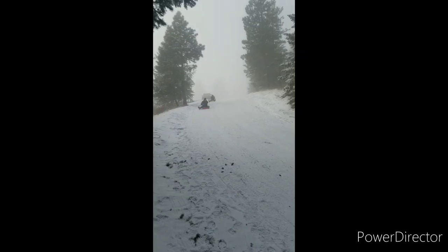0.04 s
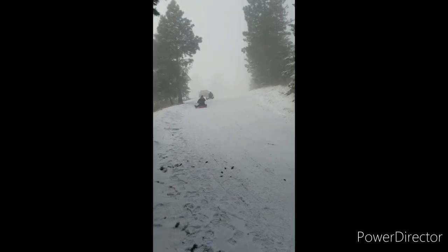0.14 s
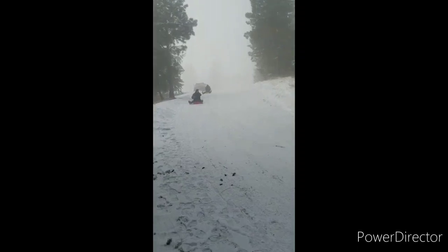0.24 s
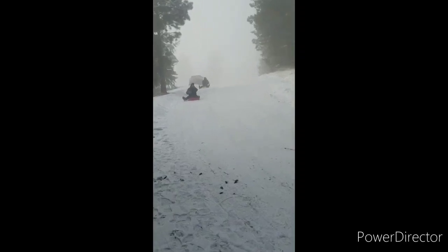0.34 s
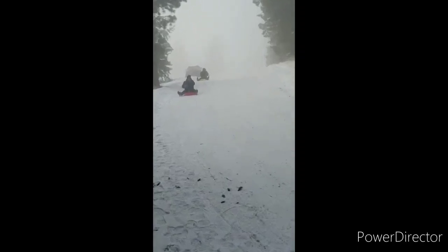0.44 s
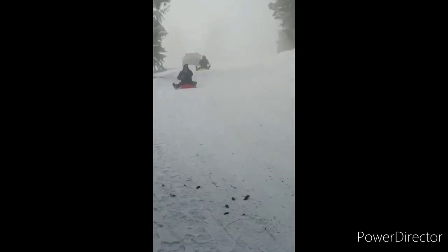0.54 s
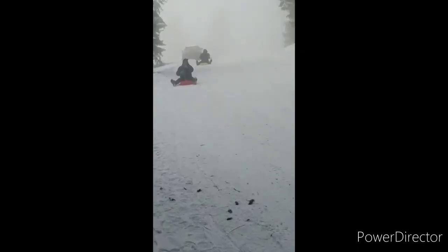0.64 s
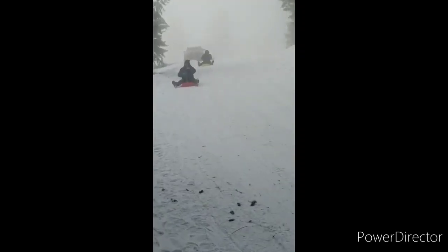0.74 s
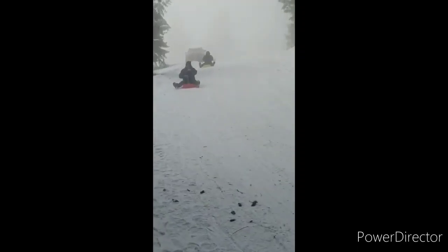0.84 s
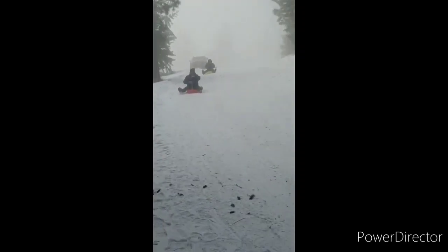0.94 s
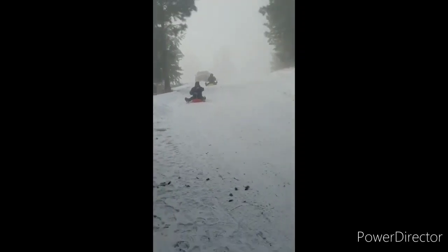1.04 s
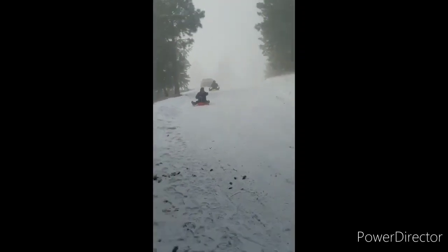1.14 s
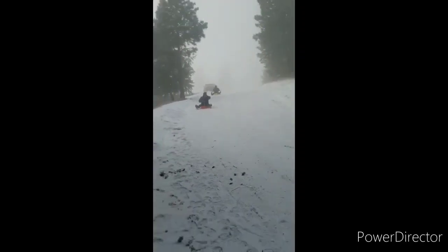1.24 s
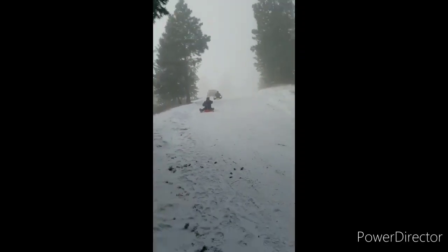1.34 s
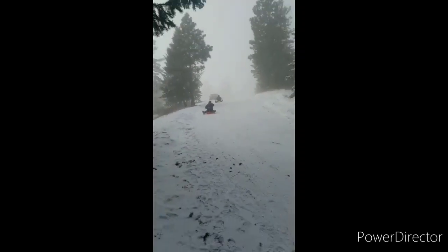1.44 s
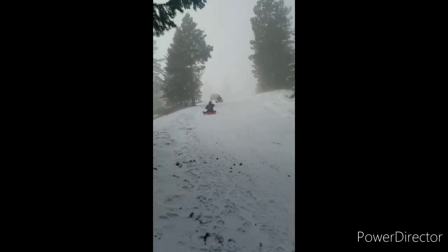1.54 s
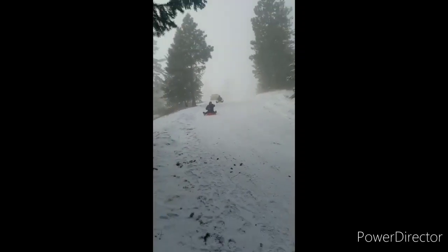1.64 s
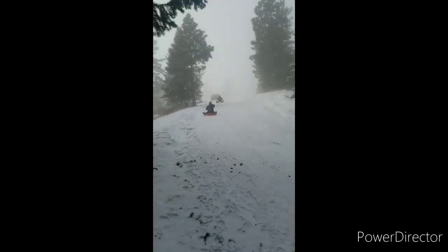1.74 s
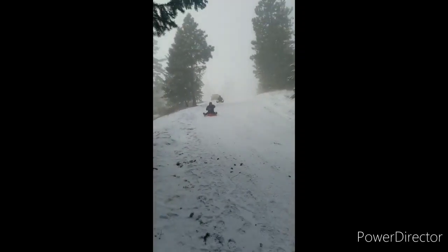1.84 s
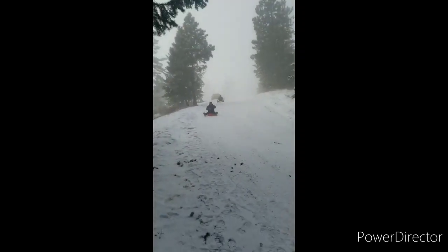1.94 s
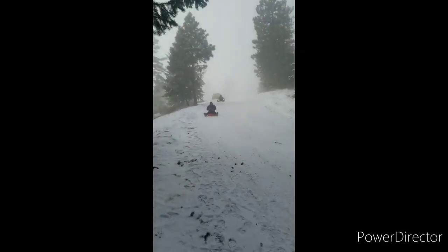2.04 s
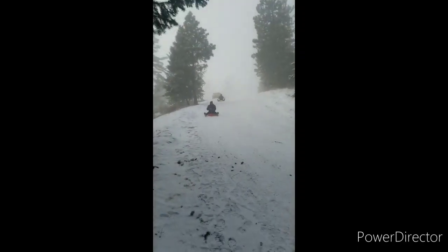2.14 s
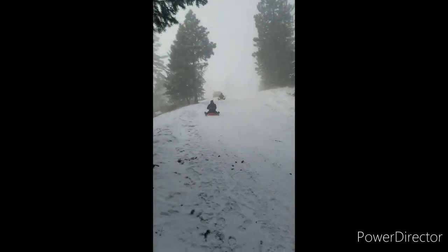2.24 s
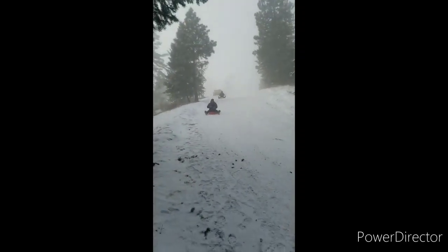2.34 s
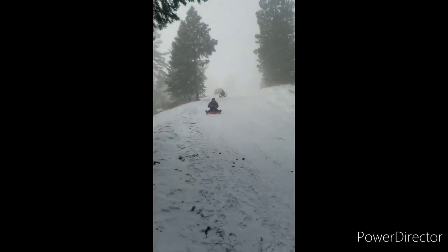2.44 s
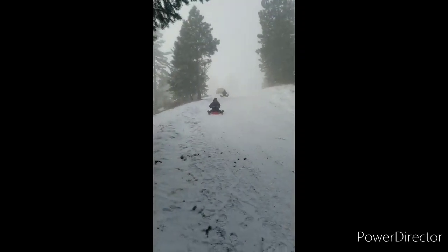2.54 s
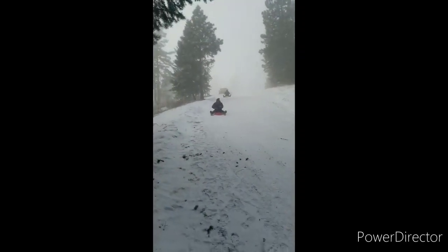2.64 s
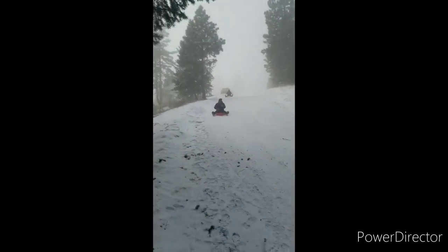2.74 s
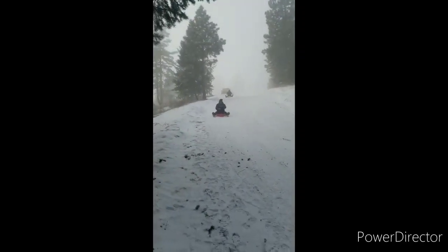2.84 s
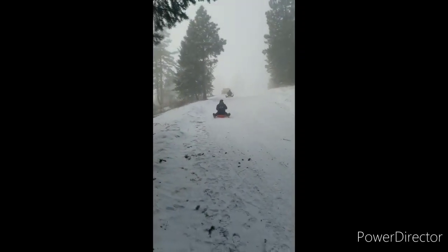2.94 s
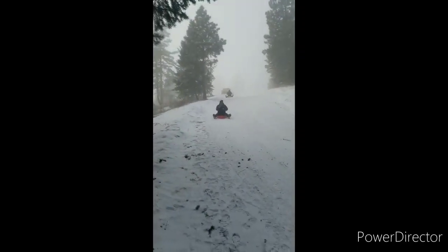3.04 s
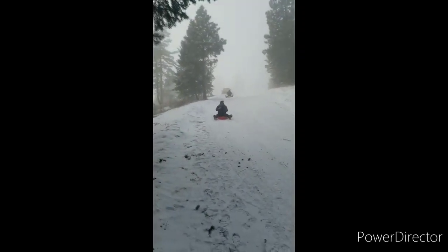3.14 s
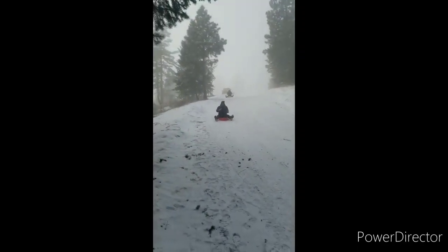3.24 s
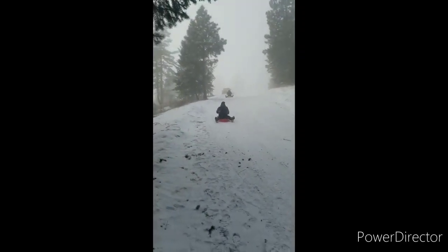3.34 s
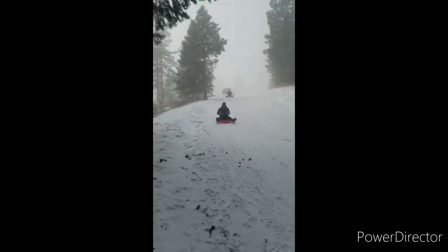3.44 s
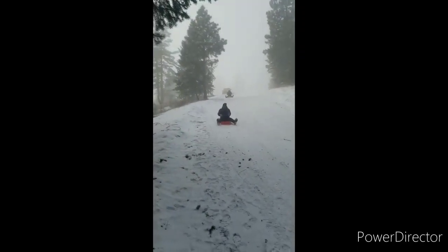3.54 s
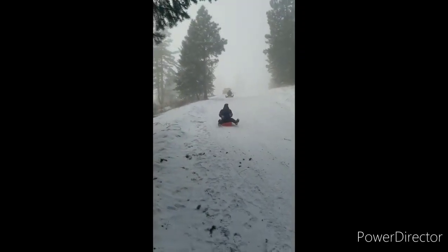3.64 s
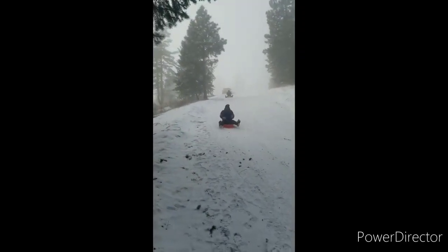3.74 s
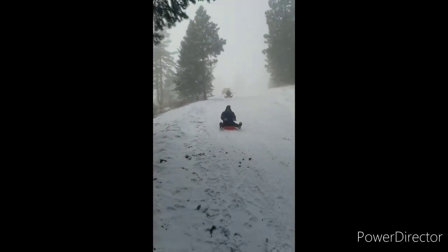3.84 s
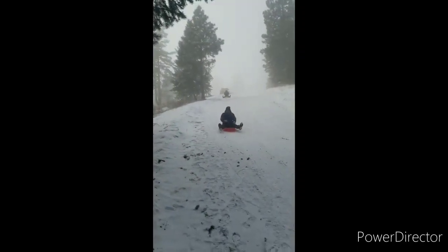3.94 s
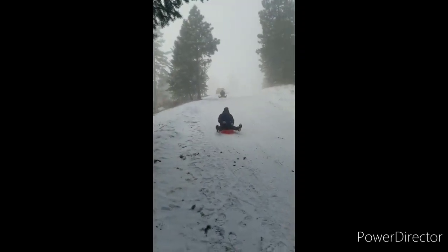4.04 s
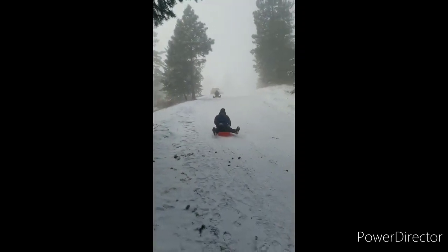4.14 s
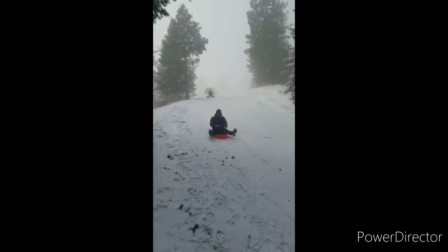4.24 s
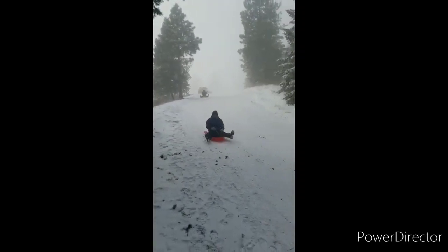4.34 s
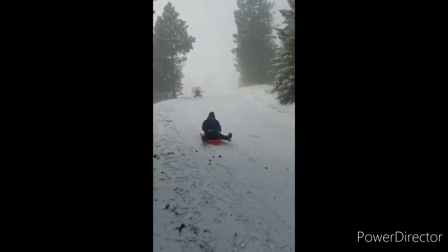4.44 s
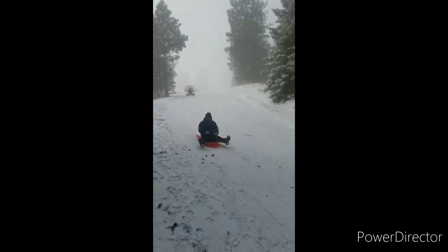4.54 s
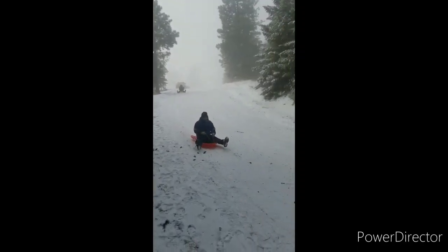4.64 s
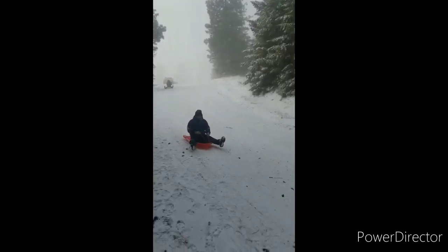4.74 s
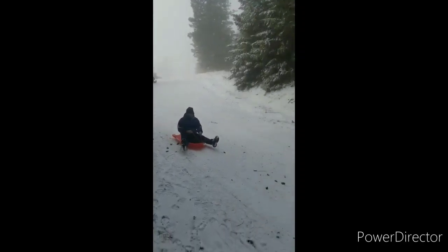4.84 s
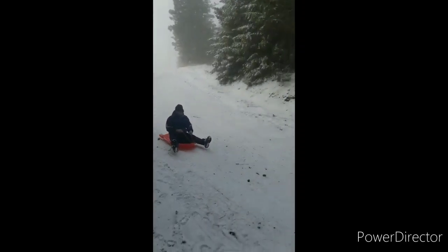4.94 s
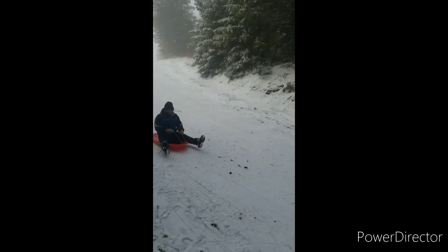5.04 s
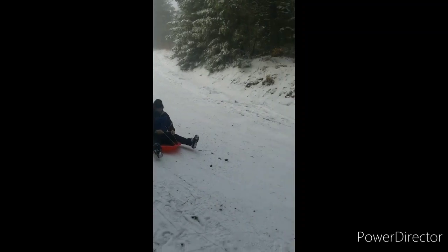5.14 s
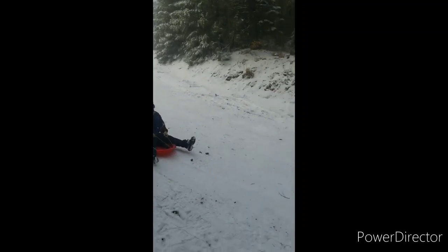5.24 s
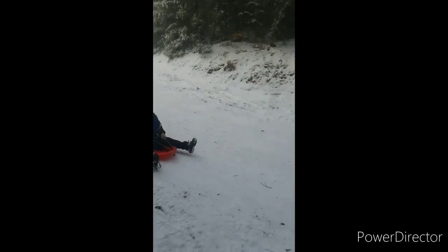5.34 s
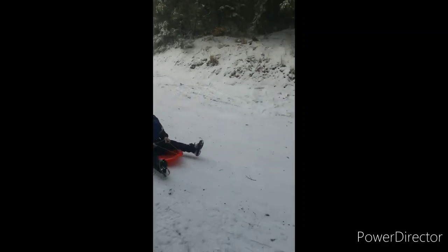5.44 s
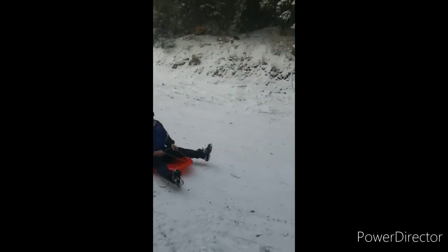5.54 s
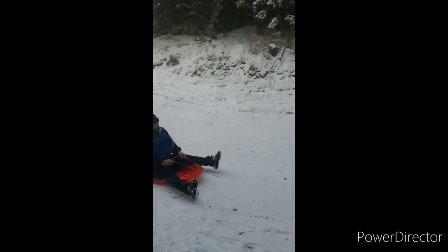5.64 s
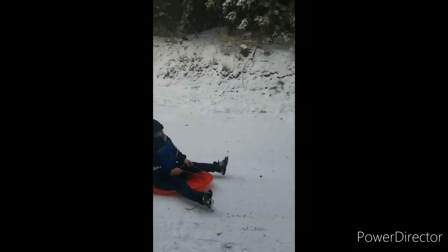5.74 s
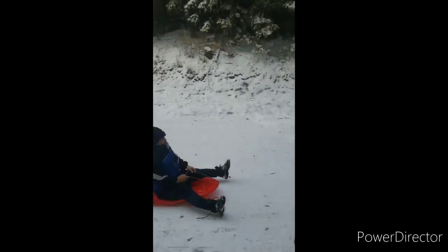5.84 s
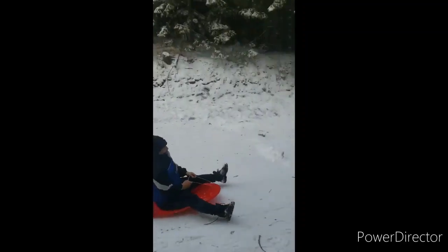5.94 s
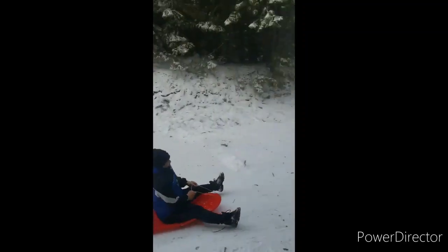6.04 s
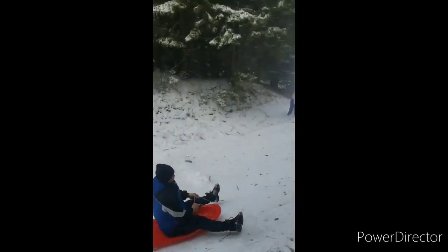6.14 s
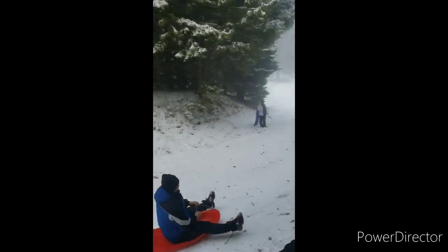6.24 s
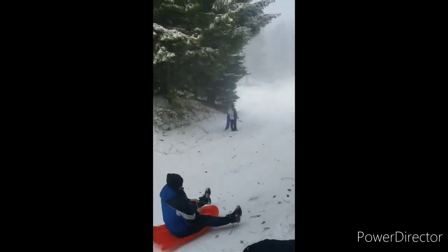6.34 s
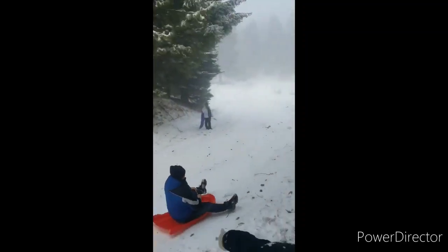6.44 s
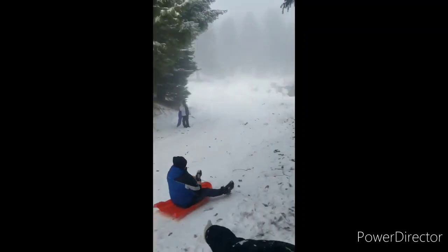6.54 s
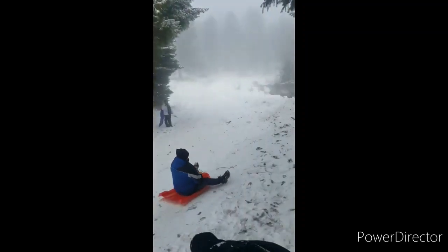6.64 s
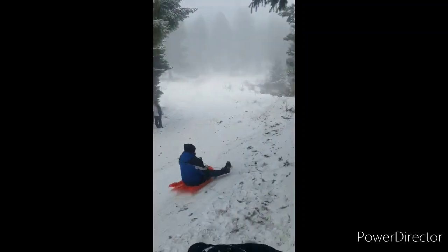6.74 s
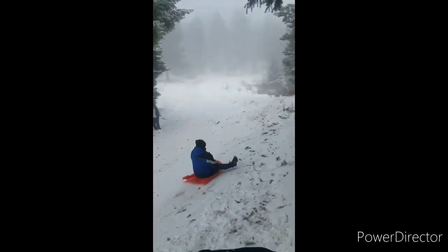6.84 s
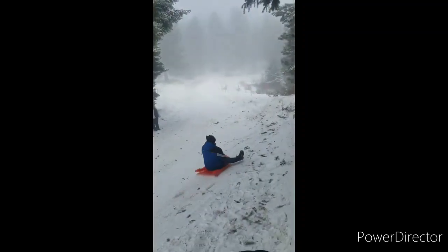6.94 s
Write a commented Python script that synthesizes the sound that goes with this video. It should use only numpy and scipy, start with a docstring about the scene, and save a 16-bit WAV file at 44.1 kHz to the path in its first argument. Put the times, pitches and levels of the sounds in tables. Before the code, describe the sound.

A plastic sled hisses and scrapes down a snowy slope, growing into a drumming, clacking rush past the camera, with handling ticks and crunching boots.

```python
"""Plastic sled passing on snow

A plastic sled comes down a snowy track from afar and passes close by a hand-held camera with two ports.
Snow grains hiss under it, crust drums and scrapes on its hull, lumps flex it and clods clack on its rim.
Close to the camera, boots crunch, squeak and crack the crust, a sleeve rustles, and fingers, a shifting
hand and knocks sound on the case, over low buffeting air. Grains are random clicks, knocks short swings."""
import sys
import numpy as np
from scipy import signal
from scipy.fft import rfft, irfft
from scipy.io import wavfile
from scipy.ndimage import map_coordinates

SR = 44100
rng = np.random.default_rng(int(sys.argv[2]) if len(sys.argv) > 2 else 0)


def persist_wave(psi):
    """Save psi, clipped to +-1, as 16-bit WAV."""
    counts = np.round(np.clip(psi, -1, 1) * 32767).astype(np.int16)
    wavfile.write(sys.argv[1], SR, np.atleast_2d(counts).T)


N = 308352
TIME = np.arange(N) / SR
FREQS = np.fft.rfftfreq(N, 1 / SR)
EDGE_HZ = 14700  # upper band limit of the recorder

# Levels in all tables are relative: layers add their own trims. Colours give relative density per Hz.
# sliding friction, swelling as the sled nears: time_s, level_db
GLIDE_LEVEL = [(0, -57.5), (.25, -62), (1.15, -61.5), (2.15, -59), (3.4, -57.5), (3.97, -55), (4.8, -52),
               (5.4, -46), (5.8, -45), (6.2, -42), (6.55, -45.5), (6.99, -42)]
# bearing of the sled: time_s, left_port_lag_ms, holder_echo_delay_ms (at the right port)
SLED_BEARING = [(0, -0.14, 0.38), (1.5, -0.036, 0.57), (2.2, -0.18, 0.64), (2.9, -0.06, 0.61),
                (4, -0.045, 0.68), (5, 0.038, 0.46), (5.4, 0.05, 0.38), (6, 0.118, 0.23),
                (6.35, 0.32, 0.21), (6.6, 0.43, 0.26), (7, 0.27, 0.33)]
# roughness of the crust under the hull: time_s, drumming_above_friction_db
CRUST_ROUGHNESS = [(2.9, 7), (3.3, 2), (3.6, 3), (4.15, 7.5), (5.1, 9), (5.55, 10.5), (6.2, 7), (6.8, 7)]
# hiss while up the slope: pitch_hz, density_db
HISS_FAR_COLOUR = [(600, -14), (1100, 0), (1350, -13), (1700, 0), (2200, -3), (3100, -4), (4000, -0.5),
                   (5000, 1.5), (6500, 1.5), (8800, -5.5), (10500, -3.5), (12600, 2), (14500, 0.5)]
# hiss in front: pitch_hz, density_db
HISS_NEAR_COLOUR = [(650, -1), (1100, -16), (1160, -4.5), (1400, -2), (1720, -3), (2120, 1), (2700, -4.5),
                    (2970, -3), (3390, -5), (4510, -3.5), (7290, -3.5), (8970, -9), (12200, 0),
                    (14000, -2.5), (15000, -21)]
# hiss alongside: pitch_hz, density_db
HISS_PAST_COLOUR = [(650, -13), (1100, 9), (1230, 0.5), (1400, 12), (1800, 5.5), (2100, 6), (2500, -0.5),
                    (3040, -5.5), (3350, -4.5), (3820, 0.5), (7060, -2), (9370, -8.5), (12500, -4.5),
                    (14200, -1), (15000, -32)]
# left-right balance of the hiss up the slope: pitch_hz, left_over_right_db
BALANCE_FAR = [(800, -4), (1600, -8), (2600, 2), (5000, -4), (6800, -6.5), (8800, -0.5), (10500, -1),
               (12500, -9), (14000, 1)]
# the same in front: pitch_hz, left_over_right_db
BALANCE_AHEAD = [(500, -12), (900, 28), (1500, -5.5), (2500, 3), (3400, -1.5), (5200, -3.5), (7300, -2),
                 (8300, 0), (10700, -0.5), (12100, -4.5), (13800, -1)]
# the same alongside: pitch_hz, left_over_right_db
BALANCE_ASIDE = [(1000, -4.5), (2500, 0.5), (4500, -2), (7100, -15.5), (8800, -1), (10000, -7),
                 (12300, -18), (14000, 3)]
# how alike the two ports hear the hiss: pitch_hz, likeness (0-1)
PORT_LIKENESS = [(500, 0.46), (1500, 0.74), (2700, 0.68), (5000, 0.58), (9500, 0), (14000, 0.1)]
# drumming plastic hull: pitch_hz, density_db
HULL_COLOUR = [(53, -60), (90, -7.5), (151, -3.5), (236, -0.5), (344, -6.5), (387, -8), (457, -12.5),
               (508, -15), (732, -14.5), (1020, -17), (1170, -32), (1500, -21.5), (1950, -49), (3300, -120)]
# gritty scrape of the hull: pitch_hz, density_db
SCRAPE_COLOUR = [(150, -2), (300, 0.5), (500, -6), (800, 4.5), (1000, -8.5), (1200, -18), (1500, -8.5),
                 (2500, -17)]
# hull on larger lumps: peak_s, flex_db, flex_hz, ring_s, grit_db, grit_length_s
HULL_BUMPS = [(3.417, -37.5, 200, 0.0027, -54, 0.066), (3.567, -34, 288, 0.0038, -53, 0.008),
              (3.696, -40, 300, 0.0069, -67, 0.0071), (3.769, -37, 198, 0.011, -45.5, 0.016),
              (3.791, -35, 237, 0.0071, -61, 0.0097), (3.976, -31, 228, 0.0077, -66, 0.0088),
              (4.0613, -21.5, 290, 0.0015, -31.5, 0.0039), (4.259, -32.5, 236, 0.0054, -62, 0.0068),
              (4.348, -31, 290, 0.0046, -56, 0.0084), (4.406, -33, 220, 0.0054, -40, 0.018),
              (4.461, -29.5, 245, 0.0055, -39, 0.0077), (4.524, -30.5, 247, 0.0058, -39.5, 0.01),
              (4.578, -28.5, 209, 0.0059, -51, 0.0069), (4.618, -34, 300, .005, -48, .007),
              (4.763, -27.5, 240, 0.0073, -46, 0.016), (4.841, -30, 252, 0.0065, -37, 0.014),
              (4.879, -22, 234, 0.004, -39, 0.006), (4.931, -32, 149, 0.0028, -58, .007),
              (4.944, -28.5, 220, 0.0043, -39, 0.01), (5.081, -31, 273, 0.004, -54, .008),
              (5.21, -29.5, 227, .006, -43, 0.0088), (5.32, -17.5, 233, 0.0042, -45, 0.0049),
              (5.479, -22.5, 248, 0.0048, -41, .012), (5.498, -30, 260, 0.0048, -43, 0.019),
              (5.523, -27.5, 248, 0.0072, -32, 0.0099), (5.5597, -21.5, 343, .007, -29, 0.017),
              (5.777, -20, 260, 0.0072, -37, .008), (5.809, -29.5, 282, 0.01, -52, .008),
              (5.934, -30, 246, 0.0079, -36, 0.019), (6.036, -25, 330, 0.0044, -34, 0.006),
              (6.058, -24.5, 290, 0.0055, -27, 0.0064), (6.082, -27, 294, 0.01, -35, 0.012),
              (6.147, -21, 260, 0.0038, -41, 0.0092), (6.1774, -25, 263, 0.011, -32.5, 0.02),
              (6.223, -30, 250, 0.009, -46, .008), (6.32, -28, 257, 0.0065, -52, 0.0081)]
# crust breaking against the hull: pitch_hz, density_db
RATTLE_COLOUR = [(200, 2.5), (450, 3.5), (900, -4.5), (1300, -18), (2500, -21), (6000, -26)]
# hard clods on the stiff rim: peak_s, level_db, pitch_hz
RIM_CLODS = [(4.061, -29, 684), (4.345, -45, 855), (4.411, -35.5, 754), (4.425, -34, 810),
             (4.461, -32, 774), (4.529, -33.5, 815), (4.72, -33, 680), (4.801, -36.5, 890),
             (4.841, -39, 825), (4.874, -31, 830), (5.047, -35, 820), (5.244, -32.5, 690),
             (5.466, -34, 790), (5.498, -33, 855), (5.512, -36, 880), (5.555, -26, 810),
             (5.584, -26.5, 950), (5.704, -35, 880), (5.722, -37, 925), (5.766, -28.5, 860),
             (5.864, -36, 850), (6.034, -26, 750), (6.075, -23.5, 815), (6.11, -34, 1000),
             (6.176, -30, 900), (6.317, -30, 925)]
# crumbs of a clod: pitch_hz, density_db
CRUMB_COLOUR = [(300, -9), (500, 7), (1000, -3.5), (1500, -5), (2400, -9), (3500, -23), (7000, -22)]
# boots in the snow: peak_s, rise_s, drag_s, decay_s, crunch_db, fizz_db, thud_db, left_over_right_db
BOOT_CRUNCHES = [(.078, 0.003, 0.0029, 0.0085, -35.5, -48, -52, 5),
                 (.098, .001, 0.02, .006, -54, -57, -52, -7),
                 (.125, .0015, 0.025, .003, -44.5, -54, -54, 2),
                 (.152, .0015, 0.0015, 0.0033, -45, -60, -50, -1.5),
                 (.935, 0.026, 0.0086, .016, -54, -51.5, -47, 3),
                 (.97, 0.013, 0.047, 0.0065, -55, -51.5, -52, 5),
                 (1.8, 0.014, 0, 0.058, -62, -61.5, -68, -21),
                 (2.894, 0.0061, 0.0024, 0.028, -57, -55, -60, -1),
                 (3.851, 0.0048, 0.02, .015, -84, -43.5, -73, -1),
                 (5.382, 0.0023, 0.035, .004, -37.5, -44, -39, 1),
                 (6.382, .0037, 0.0042, .0064, -37.5, -32.5, -43, -10),
                 (6.389, 0.0063, 0.00087, 0.015, -28, -27, -23.5, -6),
                 (6.452, .008, 0.021, 0.0099, -36.5, -34, -36.5, -6),
                 (6.601, 0.06, 0.0081, 0.072, -40, -37.5, -40, -7),
                 (6.876, 0.0015, 0.0028, 0.0063, -29, -27, -22.5, -7.5),
                 (6.9, .003, 0.0047, 0.008, -33, -35, -25, -8),
                 (6.958, 0.014, 0.011, .027, -53, -42, -27.5, -1)]
# crunch of a boot: pitch_hz, density_db
CRUNCH_COLOUR = [(150, 2), (450, 13.5), (700, 4.5), (950, 4), (1400, 0.5), (1800, 6), (2300, 5), (3000, -1),
                 (3700, -11.5), (4500, -14), (7000, -61)]
# fizz of a boot: pitch_hz, density_db
FIZZ_COLOUR = [(1500, -34), (3500, 0.5), (5000, 1), (6800, 12), (9000, -7), (10500, 4), (12300, 11.5),
               (14500, 5)]
# thud of a boot: pitch_hz, density_db
THUD_COLOUR = [(20, -40), (38, 7), (60, 6.5), (110, -6), (220, 2), (380, 3), (600, -21), (1500, -62)]
# twists of a boot: peak_s, rise_s, decay_s, level_db
BOOT_TWISTS = [(.083, 0.0026, 0.021, -45.5), (0.971, 0.004, 0.013, -47), (1.01, 0.0069, 0.0062, -49),
               (1.328, 0.017, 0.023, -60), (2.894, 0.0069, .015, -61)]
# snow squeaking under the sole: pitch_hz, density_db
SQUEAK_COLOUR = [(600, -33), (1000, -6), (1300, 3.5), (1600, -26), (2400, -31), (4200, -21), (5300, -9),
                 (6600, -10), (8000, -15)]
# hard cracks underfoot: peak_s, level_db, pitch_ratio (multiple of the crust's ring)
CRUST_CRACKS = [(.0795, -36.5, .68), (.09, -37, .33), (.14, -51, .85), (.152, -41, .36), (.941, -56, .5),
                (.972, -53, .72), (1.004, -53, .45), (1.013, -55, .65), (1.06, -50, .52),
                (6.3885, -18.5, 1), (6.879, -30.5, 1), (6.905, -44, 1.15)]
# ring of the icy crust: pitch_hz (at ratio 1), level_db, decay_s
CRUST_RING = [(1636, 2.5, 0.0041), (1800, -1, 0.0051), (2066, 0, 0.0018)]
# slips of the hand on the case: peak_s, length_s (sets rise and fall), rub_db, thump_db
HAND_SLIPS = [(.01, 0.011, -49, -64), (0.1, 0.078, -50, -49), (0.226, 0.062, -52, -54),
              (0.334, 0.13, -52.5, -55), (0.474, 0.13, -53.5, -65), (0.578, 0.033, -58, -57),
              (0.638, 0.047, -51, -77), (0.846, 0.065, -60.5, -79), (0.96, 0.1, -58, -72),
              (1.043, 0.074, -49.5, -52.5), (1.18, 0.064, -61, -60), (1.356, 0.13, -59, -50.5),
              (1.496, 0.11, -55, -47.5), (1.615, 0.073, -47.5, -63), (1.704, 0.013, -47, -69),
              (1.832, 0.13, -52.5, -53.5), (2.092, 0.025, -58, -45.5), (2.158, 0.13, -51.5, -59),
              (2.338, 0.047, -50, -54), (2.477, 0.015, -45, -64), (2.525, 0.082, -46.5, -55.5),
              (2.704, 0.19, -54.5, -48), (2.91, 0.073, -48, -50), (3.037, 0.052, -53, -52.5),
              (3.118, 0.12, -52.5, -57)]
# hand on the case: pitch_hz, density_db
CASE_COLOUR = [(70, 3.5), (130, 2), (220, 1), (340, 1), (500, -7.5), (750, -10), (1150, -19), (1700, -22),
               (2600, -41)]
# sleeve brushing the jacket: peak_s, length_s (sets rise and fall), level_db
SLEEVE_RUSTLES = [(0.017, 0.032, -46), (0.094, 0.029, -35), (0.18, 0.085, -47.5), (.305, 0.032, -50.5),
                  (0.372, 0.017, -62), (0.458, 0.13, -55), (0.501, 0.025, -56), (0.617, 0.057, -66),
                  (0.894, 0.033, -52.5), (0.945, 0.031, -48.5), (.995, .035, -49.5), (1.06, 0.012, -53),
                  (1.813, .012, -59), (2.098, 0.26, -57), (2.34, .035, -66), (2.47, .012, -59),
                  (2.51, 0.034, -58), (2.902, 0.024, -46), (3.017, 0.13, -61), (3.13, 0.045, -56),
                  (6.384, 0.018, -37), (6.645, 0.11, -44), (6.88, .02, -38), (6.907, 0.019, -31),
                  (6.965, 0.036, -41)]
# sleeve cloth: pitch_hz, density_db
SLEEVE_COLOUR = [(150, -10), (350, -3.5), (550, 2.5), (850, -4.5), (1300, -13), (1800, -14.5),
                 (2800, -20.5), (6000, -22), (10000, -30)]
# fingers on the case: start_s, tick_db, push_db
FINGER_TAPS = [(0.0977, -15, -45), (.1245, -17.5, -42), (.153, -21, -49), (0.201, -31, -47),
               (0.3385, -21.5, -34), (0.426, -30.5, -39), (.705, -46, -53), (1.3045, -21, -52),
               (1.371, -36, -38), (1.452, -20, -36), (1.4549, -17.5, -28), (1.784, -17, -34),
               (1.7886, -19, -40), (1.9342, -29, -31), (2.683, -42, -30), (2.6969, -35, -23),
               (2.721, -41, -23), (2.755, -20, -18.5), (2.7999, -19.5, -17.5), (2.872, -10, -20.5)]
# fingertip tick: pitch_hz, density_db
TICK_COLOUR = [(300, 5), (1300, 3), (3000, -7), (4200, -7.5), (6500, 2), (9000, -15), (12500, 2.5),
               (14500, -9)]
# dull knocks of the camera as the hand shifts and its holder steps: peak_s, level_db, pitch_hz, decay_s
CAMERA_KNOCKS = [(.203, -37, 340, .002), (0.243, -43, 300, 0.0028), (0.306, -41, 212, 0.0048),
                 (.817, -45, 234, 0.0051), (.956, -37, 258, .004), (.972, -38, 267, 0.0051),
                 (1.018, -38, 260, .004), (1.033, -37, 150, 0.0036), (1.04, -36, 280, 0.0036),
                 (1.0601, -34, 230, 0.0034), (1.081, -40, 200, .008), (1.502, -50, 213, 0.0044),
                 (1.551, -40, 181, .006), (1.608, -41, 300, 0.004), (1.714, -39, 261, 0.0028),
                 (1.81, -39, 222, 0.0033), (2.095, -38, 260, 0.0064), (2.162, -41, 262, .003),
                 (2.293, -38, 169, 0.0036), (2.335, -42, 275, 0.0041), (2.481, -31.5, 338, 0.0037),
                 (2.498, -39, 316, .004), (2.673, -34, 120, 0.0054), (2.908, -37, 238, 0.0044),
                 (6.878, -12.5, 324, 0.0015), (6.893, -14.5, 284, 0.0034), (6.912, -14.5, 312, 0.003),
                 (6.925, -29, 300, 0.0045), (6.946, -23, 250, 0.0029), (6.96, -24, 290, 0.0066),
                 (6.981, -24, 340, 0.0054)]
# heavy steps that jolt the camera: peak_s, level_db
CAMERA_JOLTS = [(6.387, -27), (6.881, -25)]
# buffeting air: pitch_hz, density_db
AIR_COLOUR = [(15, -42), (30, -24), (45, -5.5), (65, 0.5), (100, -3.5), (160, -9.5), (400, -38.5)]


def hiss(far_db=2, near_db=4.5, past_db=3, flutter_db=1.2, near_s=3.72, past_s=5.73, turn_s=0.95):
    """Countless crystals break under the hull; part arrives straight, part scattered by the slope."""
    same = np.clip(read(PORT_LIKENESS, FREQS), 0, 1)
    straight = rfft(from_sled(grains(per_s=14000, spread_db=6.5)))
    scattered = rfft(rng.standard_normal((2, N)))
    snow = holder_echo(irfft(same * straight + np.sqrt(1 - same ** 2) * scattered, N))
    snow = patchy(snow, db=1.6, span_hz=450, span_s=0.3)
    # fades of length turn_s, centred where the sled comes in front and then alongside
    near = np.clip(.5 + (TIME - near_s) / turn_s, 0, 1)
    past = np.clip(.5 + (TIME - past_s) / turn_s, 0, 1)
    places = [
        (1 - near, HISS_FAR_COLOUR, BALANCE_FAR, far_db),
        (near - past, HISS_NEAR_COLOUR, BALANCE_AHEAD, near_db),
        (past, HISS_PAST_COLOUR, BALANCE_ASIDE, past_db),
    ]
    out = np.zeros((2, N))
    for share, tone, balance, db in places:
        heard = irfft(rfft(colour(snow, tone)) * sides(read(balance, FREQS)), N)
        out += share * gain_of(db) * evened(heard)
    return out * gain_of(follow(GLIDE_LEVEL) + flutter_db * wander(hz=22.4))


def hull(drum_db=-1.5, surge_db=1.5, scatter=0.23, scrape_db=-1.0, clump_db=3.5):
    """Small lumps of crust drum on the plastic shell in surges, over a gritty scrape."""
    lumpiness = wander(hz=18)  # shared, so drum and scrape surge together
    glide_db = follow(GLIDE_LEVEL)
    blows = from_sled(grains(per_s=900, spread_db=1.5)) + scatter * rng.standard_normal((2, N))
    drum = evened(colour(blows * gain_of(surge_db * lumpiness), HULL_COLOUR))
    drum = drum * gain_of(glide_db + follow(CRUST_ROUGHNESS) + drum_db) * sides(db=-2.5)
    grit = from_sled(grains(per_s=600, spread_db=0.5)) + 0.29 * rng.standard_normal((2, N))
    grit = grit * gain_of(clump_db * lumpiness)
    scrape = patchy(colour(grit, SCRAPE_COLOUR), db=5.5, span_hz=260, span_s=0.043)
    scrape = scrape * gain_of(glide_db + scrape_db) * sides(db=2.5)
    drum_fade = np.clip((TIME - 2.8) / 0.72, 0, 1)
    scrape_fade = np.clip((TIME - 3.0) / 1.5, 0, 1)
    return drum * drum_fade + scrape * scrape_fade


def bumps(flex_db=0, rise_share=0.27, shake_db=-15, shake_s=0.021, grit_db=0, grit_rise_share=0.18):
    """A lump flexes the hull, which swings briefly at that knock's pitch; crust grinds under it."""
    flexed, shaken, broken = np.zeros((3, N))
    t = np.arange(-1000, 4000) / SR
    for s, db, hz, ring_s, crust_db, crust_s in HULL_BUMPS:
        swing = -np.cos(2 * np.pi * hz * t) * peaked(t, rise_share * ring_s, ring_s)
        add(flexed, s + t[0], gain_of(db + flex_db) * swing)
        add(shaken, s + t[0], gain_of(db + shake_db) * peaked(t, ring_s, shake_s))
        grind = peaked(t, grit_rise_share * crust_s, crust_s)
        add(broken, s + t[0], gain_of(crust_db + grit_db) * grind)
    shudder = shaken * evened(colour(rng.standard_normal(N), HULL_COLOUR))
    rattle = broken * evened(colour(rng.standard_normal(N), RATTLE_COLOUR))
    return from_sled(flexed + shudder + rattle) * sides(db=-3.5)


def clods(ring_db=2, rise_s=0.0004, ring_s=0.0014, crumble_db=-9, crumble_s=0.004):
    """A clod strikes the rim, which rings for a cycle or two, and bursts into crumbs."""
    rung, burst = np.zeros((2, N))
    t = np.arange(-500, 2000) / SR
    for s, db, hz in RIM_CLODS:
        ring = np.cos(2 * np.pi * hz * t) * peaked(t, rise_s, ring_s)
        add(rung, s + t[0], gain_of(db + ring_db) * ring)
        add(burst, s + t[0], gain_of(db + crumble_db) * peaked(t, rise_s, crumble_s))
    crumbs = evened(colour(grains(per_s=2400, spread_db=2.5), CRUMB_COLOUR))
    return from_sled(rung + burst * crumbs) * sides(db=0)


def boots(crunch_db=0, fizz_db=0.5, thud_db=-1, shared=0.39):
    """Packed snow gives way in a burst of grains over a soft thud."""
    left, right, both = (grains(per_s=6000, spread_db=4.2) for _ in range(3))
    snow = np.array([left, right]) + shared * both
    crunch = patchy(colour(snow, CRUNCH_COLOUR), db=1.5, span_hz=500, span_s=0.056)
    fizz = patchy(colour(snow, FIZZ_COLOUR), db=1.5, span_hz=500, span_s=0.056)
    thud = evened(colour(rng.standard_normal(N), THUD_COLOUR))
    out = np.zeros((2, N))
    for s, rise, drag, decay, mid_db, high_db, low_db, pan_db in BOOT_CRUNCHES:
        span = slice(max(int((s - .15) * SR), 0), int((s + .3) * SR))
        press = peaked(TIME[span] - s, rise, decay, drag)
        snap = gain_of(mid_db + crunch_db) * crunch[:, span] + gain_of(high_db + fizz_db) * fizz[:, span]
        weight = gain_of(low_db + thud_db) * thud[span]
        out[:, span] += press * (snap * sides(pan_db) + weight * sides(db=2.0))
    return out


def squeak(trim_db=0, clump_db=4.0, apart=0.45):
    """Cold snow slips under a turning sole in uneven clumps of clicks."""
    slips = grains(per_s=470, spread_db=-1.5) + apart * rng.standard_normal((2, N))
    slips = slips * gain_of(clump_db * wander(hz=90))
    press = sum(gain_of(db + trim_db) * swell(s, rise, decay) for s, rise, decay, db in BOOT_TWISTS)
    return evened(colour(slips, SQUEAK_COLOUR)) * press * sides(db=-1)


def crack(rise_s=0.001, lag_ms=0.48):
    """A piece of icy crust gives way close by and rings for a few milliseconds, later at the left port."""
    t, out = np.arange(-500, 2000) / SR, np.zeros(N)
    for s, level_db, pitch in CRUST_CRACKS:
        for hz, db, decay in CRUST_RING:
            tone = np.sin(2 * np.pi * (pitch * hz * t + rng.random()))
            add(out, s + t[0], gain_of(db + level_db) * peaked(t, rise_s, decay) * tone)
    return np.array([delayed(out, lag_ms), out]) * sides(db=-6)


def grip(trim_db=2, resting_db=-63, surge_db=1.5, apart=0.62):
    """The hand rubs on the case in small dull slips, over a faint resting rustle."""
    friction = grains(per_s=1500, spread_db=1.5) + apart * rng.standard_normal((2, N))
    rub = evened(colour(friction * gain_of(surge_db * wander(hz=34.5)), CASE_COLOUR))
    slips = sum(gain_of(db + trim_db) * slip(s, length) for s, length, db, _ in HAND_SLIPS)
    return rub * np.hypot(slips, gain_of(resting_db)) * sides(db=-4.5)


def sleeve(trim_db=0, clump_db=3.5, apart=0.49):
    """Stiff cloth catches and lets go in short, grainy rustles."""
    catches = grains(per_s=1100, spread_db=0.5) + apart * rng.standard_normal((2, N))
    catches = catches * gain_of(clump_db * wander(hz=60))
    cloth = patchy(colour(catches, SLEEVE_COLOUR), db=5.5, span_hz=300, span_s=0.07)
    brushing = sum(gain_of(db + trim_db) * slip(s, length) for s, length, db in SLEEVE_RUSTLES)
    return cloth * brushing * sides(db=0.0)


def fingers(tick_db=4, grit=0.091, grit_s=0.0012, push_db=0, push_hz=190, push_s=0.0023):
    """A sharp tick with a trace of grit beside the right port, then a damped push of the case."""
    t, ticks, pushes = np.arange(2000) / SR, np.zeros(N), np.zeros(N)
    push = -np.cos(2 * np.pi * push_hz * t) * np.exp(-t / push_s) * (1 - np.exp(-t / 0.0003))
    for s, high_db, low_db in FINGER_TAPS:
        trace = grit * rng.standard_normal(len(t)) * np.exp(-t / grit_s)
        add(ticks, s, gain_of(high_db + tick_db) * (trace - (t == 0)))
        add(pushes, s, gain_of(low_db + push_db) * push)
    # an all-pass smears each tick over a few samples without recolouring it
    smeared = signal.lfilter([.6, 0, 0, 1], [1, 0, 0, .6], colour(ticks, TICK_COLOUR))
    return (smeared + pushes) * gain_of([[-26], [1]])  # left, right dB


def knocks(trim_db=0, rise_s=0.0013):
    """The camera's body is jarred and swings once or twice."""
    t, jarred = np.arange(-1000, 4000) / SR, np.zeros(N)
    for s, db, hz, decay in CAMERA_KNOCKS:
        swing = peaked(t, rise_s, decay) * -np.cos(2 * np.pi * hz * t)
        add(jarred, s + t[0], gain_of(db + trim_db) * swing)
    return jarred * sides(db=-3)


def air(calm_db=-67, sled_db=1, gust_db=4.0, thump_db=0, jolt_rise_s=0.0037, jolt_s=0.06, apart=0.57):
    """Low buffeting grows with the sled and jumps as the camera is moved; hand thumps favour the right port."""
    noise = rng.standard_normal(N) + apart * rng.standard_normal((2, N))
    passing = gain_of(follow(GLIDE_LEVEL) + sled_db + gust_db * wander(hz=21))
    passing = passing * np.clip((TIME - 3.4) / 0.72, 0, 1)
    thumps = sum(gain_of(db + thump_db) * slip(s, length) for s, length, _, db in HAND_SLIPS) * sides(db=-10)
    jolts = sum(gain_of(db) * swell(s, jolt_rise_s, jolt_s) for s, db in CAMERA_JOLTS)
    level = np.sqrt(gain_of(calm_db) ** 2 + passing ** 2 + thumps ** 2 + jolts ** 2)
    return evened(colour(noise, AIR_COLOUR)) * level * sides(db=-0.5)


def from_sled(x):
    """The sled's sound reaches the left port later as it goes by."""
    return np.array([delayed(x, follow(SLED_BEARING)), x])


def holder_echo(x):
    """A close reflection off the holder, its delay moving with the bearing: hollows sweep through the hiss."""
    ms = follow(SLED_BEARING, axis=2)
    left_echo = .14 * delayed(x[0], 1.75 * ms)
    right_echo = .22 * delayed(x[1], ms)
    return x + np.array([left_echo, right_echo])


def delayed(x, ms):
    """x heard ms later, between samples too; ms may be a curve."""
    return map_coordinates(x, [np.arange(N) - ms * SR / 1000], order=3)


def grains(per_s, spread_db):
    """Clicks of either sign at random times, with exponentially spread levels, at unit RMS."""
    size = gain_of(spread_db * np.minimum(rng.exponential(1, N), 4))
    struck = rng.random(N) < per_s / SR
    return evened(size * rng.choice([-1, 1], N) * struck)


def patchy(x, db, span_hz, span_s):
    """Lets the colour drift in random bright and dull patches, scaled by span_hz and span_s, at unit RMS."""
    hz, t, z = signal.stft(x, SR, nperseg=512)
    field = rng.standard_normal(z.shape[-2:])
    across = np.fft.fftfreq(len(hz), hz[1])[:, None]
    along = np.fft.fftfreq(len(t), t[1])
    blur = np.exp(-(across * span_hz) ** 2 - (along * span_s) ** 2)
    field = np.fft.ifft2(np.fft.fft2(field) * blur).real
    _, drifting = signal.istft(z * gain_of(db * evened(field)), SR, nperseg=512)
    return evened(drifting[..., :N])


def wander(hz):
    """Slow random drift of unit RMS, fading out above hz."""
    return evened(irfft(rfft(rng.standard_normal(N)) / (1 + (FREQS / hz) ** 4), N))


def peaked(t, rise_s, decay_s, hold_s=0):
    """An exponential envelope that peaks at t = 0, holds and dies away."""
    rise = np.minimum(t, 0) / abs(rise_s)
    fall = np.maximum(t - hold_s, 0) / abs(decay_s)
    return np.exp(np.maximum(rise - fall, -30))


def swell(s, rise_s, decay_s):
    """An envelope over the whole scene that peaks at time s."""
    return peaked(TIME - s, rise_s, decay_s)


def slip(s, length, rise_share=0.6, fall_share=0.45):
    """A slip or brush builds a little more slowly than it dies away."""
    return swell(s, rise_share * length, fall_share * length)


def add(mix, s, sound):
    """Lays a sound into the mix from time s, in place."""
    part = mix[..., max(round(s * SR), 0):][..., :sound.shape[-1]]
    part += sound[..., :part.shape[-1]]


def colour(x, points):
    """Filters x by a spectrum in dB."""
    return irfft(rfft(x) * gain_of(read(points, FREQS)), N)


def read(points, hz):
    """A spectrum's value at hz, interpolated along log frequency."""
    f, value = np.transpose(points)
    return np.interp(np.log(hz + 1), np.log(f + 1), value)


def follow(rows, axis=1):
    """One column of a curve at every sample."""
    return np.interp(TIME, np.transpose(rows)[0], np.transpose(rows)[axis])


def sides(db):
    """Gains of the left and right ports for a left-over-right difference."""
    return gain_of(np.array([[.5], [-.5]]) * db)


def gain_of(db):
    """Amplitude gain for a level in dB."""
    return 10 ** (np.asarray(db) / 20)


def evened(x):
    """x scaled to unit RMS."""
    return x / np.sqrt(np.mean(x ** 2) + 1e-20)


def scene():
    """The sled on the slope, and the small sounds of whoever stands watching it."""
    sled = hiss() + hull() + bumps() + clods()
    holder = boots() + squeak() + crack() + grip() + sleeve() + fingers() + knocks() + air()
    return sled + holder


def record(dry, low_cut_hz=38):
    """The microphone's bass roll-off and the recorder's band limit."""
    bass_cut = signal.butter(3, low_cut_hz, "high", fs=SR, output="sos")
    heard = signal.sosfiltfilt(bass_cut, dry)  # run both ways, so without phase shift
    band_limit = signal.firwin(511, EDGE_HZ, window=("kaiser", 9), fs=SR)
    return signal.oaconvolve(heard, band_limit[None], "same")


dry = scene()
out = record(dry)
persist_wave(out)
```